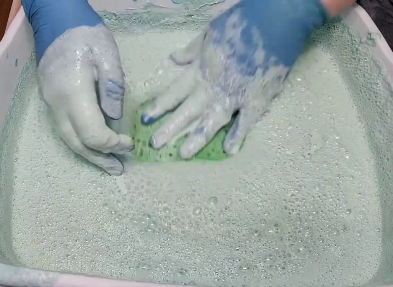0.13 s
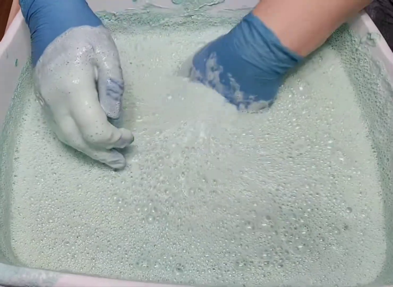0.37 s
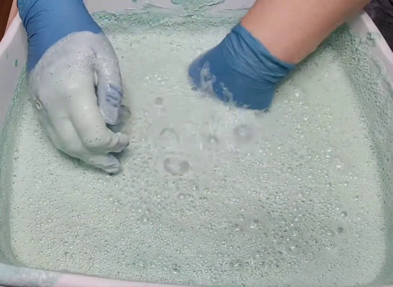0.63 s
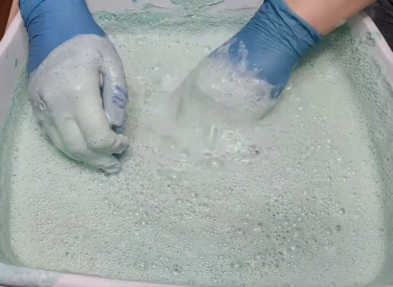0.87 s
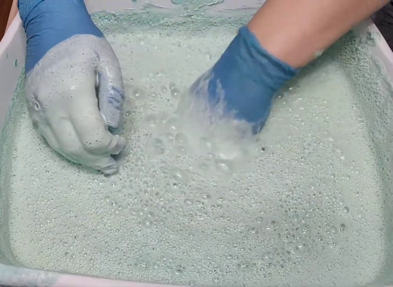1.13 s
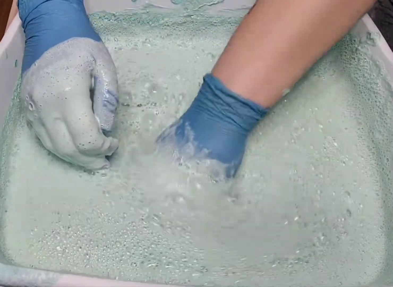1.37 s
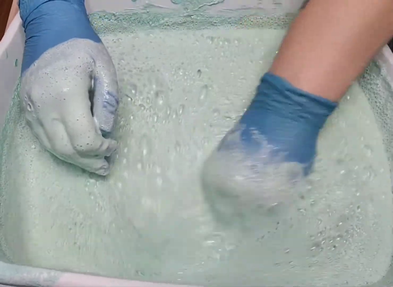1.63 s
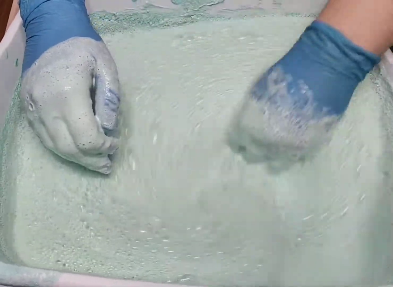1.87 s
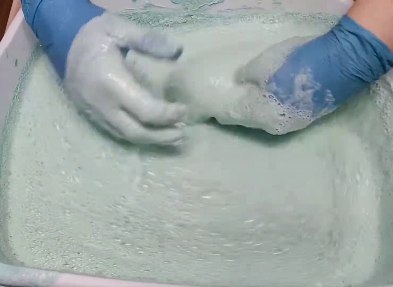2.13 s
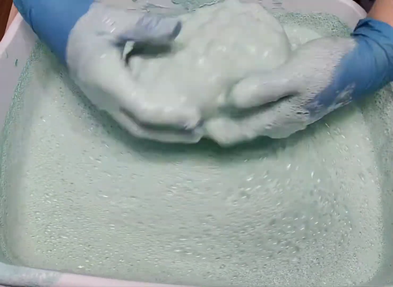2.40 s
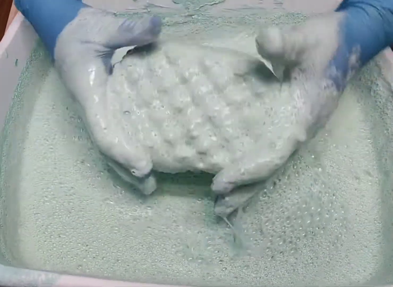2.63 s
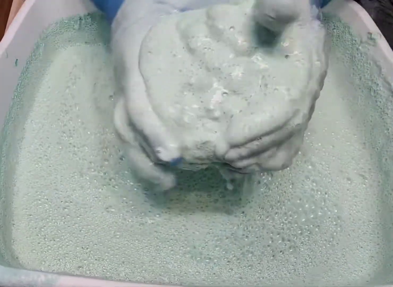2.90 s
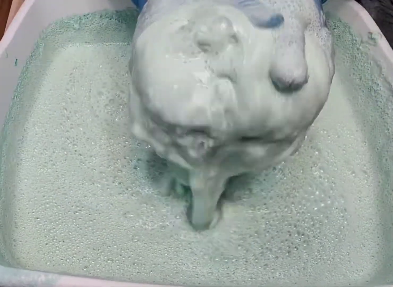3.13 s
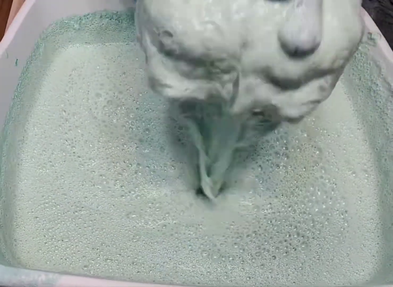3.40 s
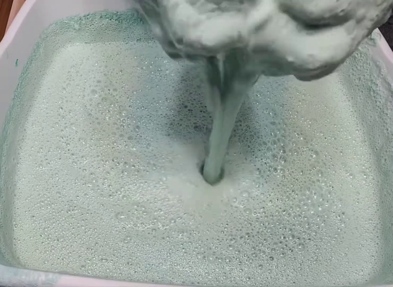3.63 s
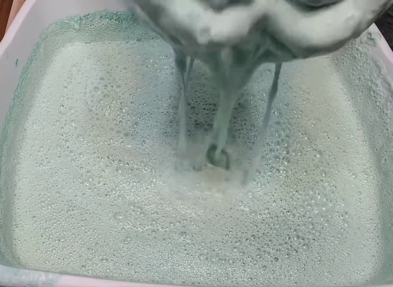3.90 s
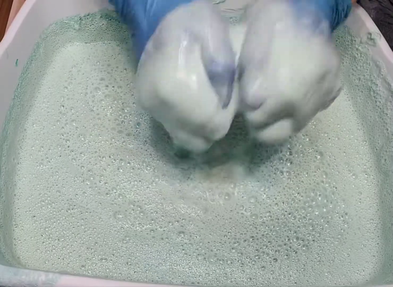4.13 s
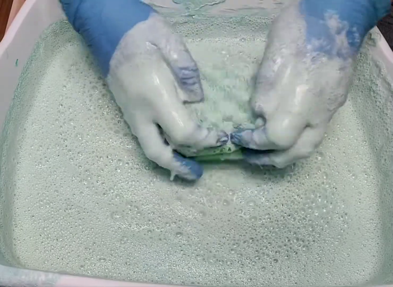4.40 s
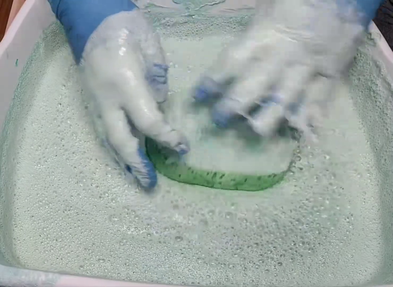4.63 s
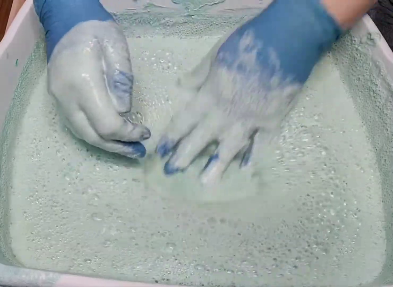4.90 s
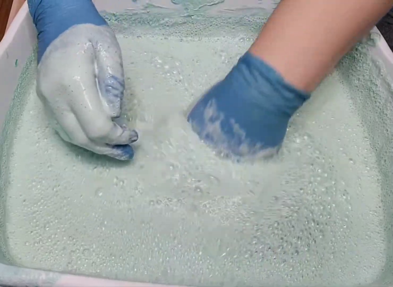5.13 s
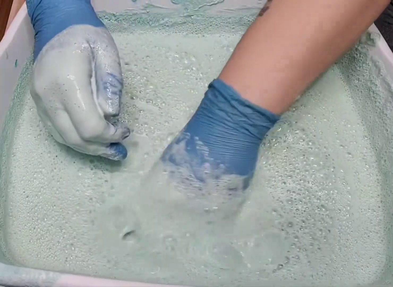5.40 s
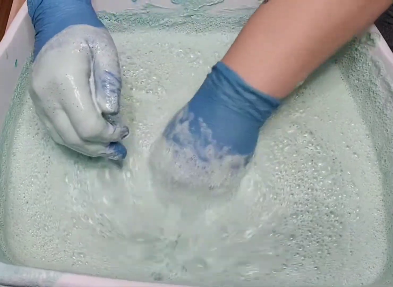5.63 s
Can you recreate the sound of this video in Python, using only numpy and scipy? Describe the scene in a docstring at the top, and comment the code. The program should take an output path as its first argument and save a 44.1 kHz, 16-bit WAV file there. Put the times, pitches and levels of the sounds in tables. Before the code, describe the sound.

A close, slightly left-weighted stereo pickup of a plastic tub of foamy paste, in a quiet room with soft low air noise and faintly wavering hum. From 0 to 0.75 s, soft wet squelches and small hollow pops, fullest near 0.4 s. From 1.1 to 2.2 s, two overlapping smooth hissing rubs swell and fade with a fuzzy whistle, the second higher. Faint squishes and ticks fill 2.2 to 2.9 s. At about 3 s a wringing squeeze surges, peaking at 3.2 s in dense bubbly crackle, with low gulps near 3.4 s. It thins toward 4.3 s into sharp film ticks, popping blobs and dull tub thumps. A very loud bright snap hits at 4.35 s, followed by squelches until 4.7 s. Small pops and squishes around 5.15 s and low gurgles from 5.3 s lead to a last soft whistling rub from 5.6 s. Everything carries a short, thin tub echo.

```python
"""Gloved hands dunk a sponge in a plastic tub of foamy paste: noise and ringing bubbles squelch under pressure.
Two smooth strokes of hissing grit drag it along the bottom, each with a fuzzy whistle.
Then it is lifted and wrung: foam crackles loudly, torn films tick, blobs pop and thump the tub, bubbles gulp.
The dripping thins out, the sponge is let go and a last stroke follows.
All along, the tub and room echo, and a quiet room hums behind with soft air noise and wavering tones."""
import sys
import numpy as np
from scipy import signal
from scipy.fft import rfft, irfft
from scipy.io import wavfile
from scipy.ndimage import uniform_filter1d

SR = 44100
rng = np.random.default_rng(int(sys.argv[2]) if len(sys.argv) > 2 else 0)


def put_to_file(sound):
    """Save the sound as 16-bit audio at rate SR, in the file named by the first command-line argument."""
    columns = np.atleast_2d(sound).T  # one column per channel
    safe = np.clip(columns, -1, 1)
    whole_steps = np.round(safe * 32767)
    wavfile.write(sys.argv[1], SR, whole_steps.astype(np.int16))


def decibels_to_gain(level_db):
    """Convert a level in decibels to a linear amplitude gain (20 dB per decade)."""
    exponent = np.asarray(level_db, float) / 20
    return 10 ** exponent


N = 254456  # length in samples

# Falling blobs and bursting pockets; the pop swells to its top in a quarter of its length,
# the thump level is taken before its tone is doubled in height:
# [start_s, pop_peak_db, pocket_hz, length_s, thump_db]
BLOB_EVENTS = [(0.144, -59, 750, 0.017, -50.5), (0.317, -50, 590, 0.024, -65),
               (0.345, -40, 626, 0.015, -61), (0.362, -47, 2100, 0.018, -70),
               (0.366, -51, 1400, 0.027, -63), (0.392, -43, 700, 0.011, -59),
               (0.399, -37, 664, 0.0047, -62), (0.405, -34.5, 665, 0.0067, -47.5),
               (0.448, -45.5, 605, 0.006, -64), (0.539, -49.5, 570, 0.0067, -52.5),
               (0.7314, -40.5, 723, 0.021, -54), (2.546, -45, 520, 0.02, -70),
               (2.788, -48.5, 600, 0.023, -64), (2.968, -44.5, 650, 0.0096, -75),
               (3.389, -44, 840, 0.017, -45), (3.78, -33, 572, 0.015, -40), (3.789, -41, 540, 0.0054, -48),
               (3.817, -39.5, 990, 0.012, -47), (3.852, -30.5, 525, 0.006, -33.5),
               (3.917, -41.5, 1400, 0.012, -61), (4.021, -43, 1080, 0.008, -49),
               (4.043, -30, 980, 0.019, -38), (4.056, -31, 570, 0.0076, -47),
               (4.113, -36.5, 575, 0.016, -42), (4.154, -42.5, 485, 0.007, -49),
               (4.203, -33.5, 550, 0.0042, -38.5), (4.238, -40, 560, 0.013, -44),
               (4.273, -34, 564, 0.0064, -42.5), (4.355, -38.5, 785, 0.018, -63),
               (4.667, -34, 960, 0.0081, -62), (4.676, -31.5, 580, 0.013, -57),
               (4.694, -43, 526, 0.014, -53), (4.877, -52.5, 630, 0.02, -66.5),
               (5.134, -33, 566, 0.0049, -46), (5.155, -31.5, 700, 0.0052, -41.5),
               (5.289, -49, 536, 0.0062, -53), (5.353, -58, 1380, 0.015, -62),
               (5.4, -43.5, 555, 0.014, -49.5), (5.451, -47.5, 716, 0.0053, -48),
               (5.509, -44, 560, 0.0066, -52), (5.522, -46.5, 580, 0.016, -46.5),
               (5.553, -43, 980, 0.0098, -59)]
# Resonances of the plastic tub, the first two for its sway, the others for its walls:
# [pitch_hz, level_db, width_hz before any widening]
TUB_MODES = [(122.3, 1, 30), (177, -8, 232), (570, 0.5, 120), (700, -6.5, 133), (876, -5, 137),
             (1043, -7.5, 130), (1330, -2.5, 131), (1924, -5.5, 156), (2260, -8.5, 81), (3200, -6, 195)]


def foam():
    """Coarse and fine bubbles over a rush of paste; the tub floor sways under the load."""
    # Tone colour of the coarse bubbles: [pitch_hz, relative_level_db per Hz]
    coarse_colour = [(88, -41), (150, -10.5), (362, -6.5), (538, 1), (860, -1), (1350, -2.5), (1520, -8),
                     (2200, -5), (2580, -9), (5000, -14), (6500, -62)]
    # Tone colour of the fine bubbles: [pitch_hz, relative_level_db per Hz]
    fine_colour = [(880, -25), (1500, -4.5), (1950, -0.5), (2730, -1.5), (5350, 0.5), (10500, -15),
                   (12700, -12.5), (15000, -40)]
    # How alike left and right are near the tub: [pitch_hz, likeness from -1 to 1]
    likeness = [(60, 0.82), (180, 1), (540, 0.95), (1620, 0.28), (4860, 0.19), (14600, 0.41)]
    coarse = bubbles(coarse_colour, 2600, 8.1, 2.85, 245.2, 4480)
    coarse = coarse + 0.81 * hiss(coarse_colour, likeness, 2.0, 3.6)
    larger_pops = bubbles(coarse_colour, 220, 3.2, 4.3, 445, 3510, count=14)  # scattered
    coarse = coarse + 0.46 * larger_pops
    coarse = evened(coarse + 0.74 * walls(coarse))
    fine = 0.47 * bubbles(fine_colour, 2500, 14.2, 2.3, 1556, 15080)
    fine = fine + 0.53 * hiss(fine_colour, likeness, 1.8, 3.2)

    push = spaced(rng.standard_normal((2, N)), 0.88, 0.31)
    sway = evened(sum(decibels_to_gain(db) * resonate_twice(push, hz, width) for hz, db, width in TUB_MODES[:2]))
    squeeze = pressure(column=1, rest_db=-79.5)
    fizz = pressure(column=2, rest_db=-81.5)
    return squeeze * coarse + fizz * fine + swaying(squeeze) * sway


def bubbles(spectrum, per_s, turns, spread_db, lo_hz, hi_hz, count=24):
    """Bubbles burst at random and ring, a few much louder; each size reaches the two sides at slightly other times."""
    out = np.zeros((2, N))
    for hz in np.geomspace(lo_hz, hi_hz, count):
        bursts = rng.random(N) < per_s / count / SR
        size = np.minimum(rng.exponential(1, N), 4)
        cycles = np.arange(int(6 * turns * SR / hz) + 8) * hz / SR
        ring = cycles * np.exp(-2 * cycles / turns)
        ring *= np.sin(2 * np.pi * cycles * (1 + 0.00761 * cycles))  # the pitch climbs slightly
        ring *= decibels_to_gain(read(spectrum, hz)) * np.sqrt(hz) / np.linalg.norm(ring)
        train = signal.oaconvolve(bursts * decibels_to_gain(spread_db * size), ring)[:N]
        out += [train, np.roll(train, rng.integers(-3, 8))]  # path difference to the two microphones
    return evened(out)


def pressure(column, rest_db):
    """Gain of one bubble layer: the restless seeping, the wring and the squelches add up in power."""
    # The soaked sponge is lifted, wrung and left dripping: [time_s, squeeze_db, fine_fizz_db]
    wring = [(2.1, -100, -100), (2.3, -83, -77), (2.65, -72.5, -88), (2.9, -79, -69), (2.98, -52, -60.5),
             (3.05, -47.5, -50), (3.13, -45, -47.5), (3.2, -37, -42.5), (3.27, -37.5, -48.5),
             (3.33, -41, -67), (3.42, -42, -57), (3.52, -48, -58.5), (3.75, -51, -58), (3.94, -60, -62.5),
             (4.09, -54.5, -62), (4.31, -71, -56), (4.4, -100, -100)]
    # Short squelches as the sponge is dunked, gripped, let go:
    # [peak_s, squeeze_db, fine_fizz_db, rise_s, fall_s]
    squelches = [(0.018, -66.5, -71, 0.16, 0.054), (0.15, -82, -64, 0.15, 0.11),
                 (0.388, -52, -54.5, 0.1, 0.055), (0.75, -74, -93, 0.085, 0.14),
                 (2.22, -69.5, -76, 0.043, 0.17), (2.55, -66, -66, 0.051, 0.33),
                 (2.8, -65.5, -54, 0.088, 0.066), (4.37, -58, -43, 0.04, 0.15),
                 (4.521, -54, -51, 0.3, 0.15), (4.691, -51.5, -53, 0.04, 0.036),
                 (4.889, -76.5, -65.5, 0.041, 0.21), (5.09, -68, -88, 0.34, 0.052),
                 (5.169, -56, -54.5, 0.061, 0.018), (5.361, -63.5, -69, 0.09, 0.14),
                 (5.538, -70.5, -80, 0.16, 0.18), (5.62, -67.5, -73, 0.1, 0.052)]
    power = decibels_to_gain(rest_db) ** 2 + decibels_to_gain(curve(wring, column)) ** 2
    for row in squelches:
        power = power + decibels_to_gain(row[column] + bump(row[0], *row[3:])) ** 2
    return np.sqrt(power)


def bump(peak_s, rise, fall):
    """Straight dB slopes: 18 dB down one rise time before the peak and one fall time after it."""
    t = np.arange(N) / SR - peak_s
    return -18 * np.maximum(-t / rise, t / fall)


def swaying(squeeze):
    """Gain of the tub's sway: it follows the squeeze and lingers after each thump."""
    t = np.arange(N) / SR
    hit_db, fade_s = -6.5, 0.26  # relative to the thump; time to fall by 60 dB
    after = sum((t > s) * decibels_to_gain(db + hit_db - 60 * abs(t - s) / fade_s) ** 2 for s, *_, db in BLOB_EVENTS)
    pushed = decibels_to_gain(-32) * squeeze ** 0.58
    return np.sqrt(decibels_to_gain(-72.5) ** 2 + pushed ** 2 + after)


def drag():
    """Smooth rub of grit; each stroke swells and fades, its fuzzy whistle strongest and highest at full speed."""
    # Tone colour of the rubbing grit: [pitch_hz, relative_level_db per Hz]
    grit_colour = [(650, -56), (1100, -16), (1600, -18), (1880, -6.5), (2760, -6.5), (3580, -5),
                   (4510, -6.5), (10300, -18), (15000, -20)]
    # Strokes of the sponge over the bottom; pitch and levels hold at full speed, whistle against rub:
    # [start_s, length_s, rub_db, whistle_hz, whistle_db]
    strokes = [(1.129, 0.66, -57, 2260, -14), (1.554, 0.68, -58.5, 3480, -3),
               (5.625, 0.74, -60, 2310, -7.5)]
    rub = hiss(grit_colour, [(1000, 0.17), (5000, 0.04)], 2.24, 0.17)
    out = 0
    for start, length, db, hz, whistle_db in strokes:
        progress = np.clip((np.arange(N) / SR - start) / length, 0, 1)
        speed = np.sin(np.pi * progress).clip(0)
        pitch = hz * (1 + 0.1 * (speed - 1))
        whistle = evened(resonate_twice(rub, pitch, 790))
        # the powers of speed set how round or peaked each swell is
        out = out + decibels_to_gain(db) * speed ** 0.96 * (rub + decibels_to_gain(whistle_db) * speed ** 7.6 * whistle)
    return out


def blob(pop_db, hz, length, thump_db):
    """An air pocket pops in a short ragged burst that the tub walls colour; the weight thumps the tub floor."""
    t = np.arange(SR // 8) / SR
    rise = t / length * 4
    swell = rise * np.exp(1 - rise)
    ragged = spaced(rng.standard_normal((2, len(t))) * swell, 0.95, 0.8)
    bright_hz = 7000 * decibels_to_gain(pop_db + 28.0)  # harder pops reach the higher modes
    climb = hz * (1 + 3 * t)  # the pocket shrinks, its pitch climbs
    pop = resonate(resonate(ragged, climb, 0.58 * hz), climb, 0.29 * hz)
    pop = pop + 0.5 * walls(resonate_twice(ragged, 0, bright_hz))
    bell = np.sin(2 * np.pi * np.cumsum(climb) / SR) * swell  # the pocket's own clear note
    pop = pop / abs(pop).max() + 0.43 * bell

    boom = np.sin(2 * np.pi * 128.2 * t)  # the tub floor
    rock = decibels_to_gain(-8.5) * np.sin(2 * np.pi * 65 * t)  # the whole tub
    thump = (boom + rock) * decibels_to_gain(-60 * t / 0.099) * np.minimum(t / 0.0057, 1)
    return decibels_to_gain(pop_db) * pop / abs(pop).max() + decibels_to_gain(thump_db) * 2 * thump


def gulp(db, hz, climb):
    """A large air bubble rings a few cycles, rising in pitch as it nears the surface of the paste."""
    t = np.arange(SR // 8) / SR
    fade_s = 0.14  # time to fall by 60 dB
    ring = np.sin(2 * np.pi * hz * t * (1 + climb * t))
    ring = ring * decibels_to_gain(db - 60 * t / fade_s) * np.minimum(t / 0.0021, 1)
    wobble = evened(uniform_filter1d(rng.standard_normal(len(t)), size=150))
    ring = ring * (1 + 0.5 * wobble)  # the paste makes it gurgle
    return np.array([ring, ring])


def tick(db, hz, pan_db):
    """A film of foam tears within a few milliseconds, with a faint spray after it."""
    t = np.arange(SR // 10) / SR
    snap = decibels_to_gain(-60 * t / 0.011)
    spray = decibels_to_gain(-8.5 - 60 * t / 0.022)
    tear = (snap + spray) * np.minimum(t / 0.00178, 1) ** 2
    ragged = spaced(rng.standard_normal((2, len(t))) * tear, 0.66, pan_db)
    ring = resonate_twice(ragged, hz, 1300) + 0.85 * resonate(ragged, 5430, 3870)
    tub_hz, _, tub_width = TUB_MODES[-1]
    ring = ring + 0.94 * resonate(ragged, tub_hz, tub_width)
    return decibels_to_gain(db) * ring / abs(ring).max()


def walls(x):
    """The damp tub walls ring along, each mode steep-sided."""
    return sum(decibels_to_gain(db) * resonate_twice(x, hz, 1.85 * width) for hz, db, width in TUB_MODES[2:])


def lean(x):
    """The tub sits a little to the left, most of all for the treble."""
    # Balance of the tub: [pitch_hz, left_minus_right_db]
    balance = [(60, 2), (370, -1), (2340, 3), (14600, 3.5)]
    db = read(balance, np.fft.rfftfreq(N, 1 / SR)) / 2
    return irfft(rfft(x) * decibels_to_gain(np.array([db, -db])), N)


def echo(x, count=3):
    """Short tail of the tub and the room, little bass; the paths shift as hands and paste move."""
    t = np.arange(SR // 5) / SR
    fade = decibels_to_gain(-60 * t / 0.088) + decibels_to_gain(-13.5 - 60 * t / 0.31)
    tails = rng.standard_normal((count, 2, len(t))) * fade * (t > 0.0007)
    tails[:, 1] = 0.5 * tails[:, 0] + 0.92 * tails[:, 1]  # both sides share some paths
    thin = signal.sosfilt(signal.butter(2, 450, "high", fs=SR, output="sos"), x.mean(0))
    turn = np.pi * np.arange(N) / SR / 0.09
    out = 0
    for k, tail in enumerate(tails):
        sent = thin * np.sqrt(2 / count) * np.cos(turn + np.pi * k / count)
        out = out + signal.oaconvolve(sent[None], tail / np.linalg.norm(tail[0]), axes=1)[:, :N]
    return out


def room():
    """Soft air noise, and hum tones and hissing bands that waver because they are narrowed noise."""
    # Tone colour of the air noise: [pitch_hz, relative_level_db per Hz]
    air_colour = [(25, -7), (112, -1), (191, -7), (243, -13), (318, -10.5), (604, -9.5), (833, -21.5),
                  (1500, -50), (4150, -35.5), (10300, -41.5), (12100, -36.5), (15000, -49)]
    # How alike left and right are in the room: [pitch_hz, likeness from -1 to 1]
    likeness = [(60, 0.99), (240, 0.63), (930, 0.58), (3690, -0.81), (14600, -0.036)]
    # Wavering tones and hissing bands: [pitch_hz, level_db, width_hz of each of two passes]
    hum_tones = [(114.8, -67.5, 13.5), (240.2, -73.5, 1.9), (277.4, -78.5, 5.6), (2205, -86, 160),
                 (3500, -84, 1900)]
    hum = 0
    for hz, db, width in hum_tones:
        hum = hum + decibels_to_gain(db) * evened(resonate_twice(rng.standard_normal(N), hz, width))
    return decibels_to_gain(-63.5) * hiss(air_colour, likeness, 0.79, 0.61, size=2048) + hum


def hiss(spectrum, same, patchy_db, flicker_db, size=512):
    """Two-channel noise from random short-time spectra, with patches and a flicker shared by all bands."""
    frames, hz = 4 * N // size + 5, np.fft.rfftfreq(size, 1 / SR)
    a, b, c, d, patches = rng.standard_normal((frames, len(hz), 5)).T
    patches = uniform_filter1d(patches, size=5, axis=0)  # across pitch
    patches = evened(uniform_filter1d(patches, size=12, axis=1))  # across time
    flicker = evened(uniform_filter1d(rng.standard_normal(frames), size=3))
    same = np.clip(read(same, hz), -1, 1)[:, None]
    left = a + 1j * b
    right = same * left + np.sqrt(1 - same ** 2) * (c + 1j * d)
    level_db = read(spectrum, hz)[:, None] + patchy_db * patches + flicker_db * flicker
    z = np.array([left, right]) * decibels_to_gain(level_db)
    return evened(signal.istft(z, nperseg=size, noverlap=3 * size // 4)[1][:, :N])


def spaced(x, same, pan_db):
    """The second microphone hears the same burst a little later, partly by other paths."""
    late = same * np.roll(x[0], shift=2) + np.sqrt(1 - np.clip(same, 0, 1) ** 2) * x[1]
    return decibels_to_gain(np.array([[pan_db / 2], [-pan_db / 2]])) * [x[0], late]


def resonate(x, hz, width):
    """Shifts the pitch hz (fixed or gliding) down to zero, smooths, and shifts back: a resonance of gain 1."""
    turn = np.exp(2j * np.pi * np.cumsum(hz * np.ones(x.shape[-1])) / SR)
    r = np.exp(-np.pi * width / SR)
    return 2 * (turn * signal.lfilter([1 - r], [1, -r], x / turn)).real


def resonate_twice(x, hz, width):
    """Two equal resonances in a row give steeper sides."""
    return resonate(resonate(x, hz, width), hz, width)


def evened(x):
    """Scales to an average (rms) strength of 1."""
    return x / np.sqrt(np.mean(x ** 2) + 1e-20)


def read(points, hz):
    """Reads a table by pitch on a log axis."""
    f, value = np.transpose(points)
    return np.interp(np.log(hz + 1), np.log(f + 1), value)


def curve(rows, column):
    """One column of a time table, sample by sample."""
    return np.interp(np.arange(N) / SR, *np.transpose(rows)[[0, column]])


def add(mix, s, sound):
    """Mixes a two-channel sound in at s seconds."""
    part = mix[:, round(s * SR):][:, :sound.shape[1]]
    part += sound[:, :part.shape[1]]


def scene():
    """Everything in the tub, its echo and the room."""
    # Large air bubbles gulping up through the paste; level before fade and gurgle,
    # the pitch rises by twice the climb share each second: [start_s, level_db, start_hz, climb_per_s]
    gulps = [(0.761, -49, 151, 1), (0.783, -47.5, 150, 1), (3.388, -36.5, 171, 1.1), (3.414, -46, 172, 1),
             (3.47, -38.5, 137, 0.83), (3.503, -40, 148, 1), (5.289, -45.5, 195, 2), (5.383, -41.5, 206, 4),
             (5.398, -47, 301, 5), (5.554, -44, 197, 1.9), (5.614, -48, 192, 2.2)]
    # Fine ticks of bursting film: [start_s, peak_db, pitch_hz, left_minus_right_db]
    ticks = [(0.1408, -45, 5470, 0.5), (0.296, -51, 6040, 1), (2.327, -51, 3020, -1),
             (2.4466, -53, 4430, 1), (2.5424, -51, 3100, 7), (2.729, -42, 2960, 1), (2.7923, -37, 2790, 20),
             (2.804, -38, 2900, 4), (3.385, -27, 2900, 5), (3.48, -35.5, 3240, 5), (3.5598, -34.5, 2650, 7),
             (3.62, -32, 4080, 14), (3.7001, -33.5, 3630, 4), (3.7834, -24, 3500, 3),
             (3.7905, -28.5, 2710, 2), (3.854, -31.5, 3200, 2.5), (3.913, -39.5, 3700, 0),
             (3.9212, -41, 5550, 1), (3.9745, -29, 6010, 26), (3.999, -28.5, 2720, 1),
             (4.046, -26, 2500, 11), (4.055, -24.5, 6500, 6), (4.1157, -23.5, 5000, 5.5),
             (4.14, -33.5, 3930, 14), (4.2036, -28.5, 4720, 7), (4.352, -9.5, 5400, 6),
             (4.4009, -31, 5230, 1)]
    hits = np.zeros((2, N))
    for s, *row in BLOB_EVENTS:
        add(hits, s, blob(*row))
    for s, *row in gulps:
        add(hits, s, gulp(*row))
    for s, *row in ticks:
        add(hits, s, tick(*row))
    tub = hits + lean(foam() + drag())
    return tub + decibels_to_gain(-5) * echo(tub) + room()


def band_limit(x):
    """A steep low-pass at the top of the band."""
    return signal.sosfilt(signal.butter(12, 15170, fs=SR, output="sos"), x)


def record(dry):
    """Small microphones lose the deep bass and the top."""
    band = signal.sosfilt(signal.butter(2, 45, "high", fs=SR, output="sos"), dry)
    band = signal.oaconvolve(band, signal.firwin(255, 14600, fs=SR)[None], "same")
    return band_limit(band)


dry = scene()
out = record(dry)
put_to_file(out)
```